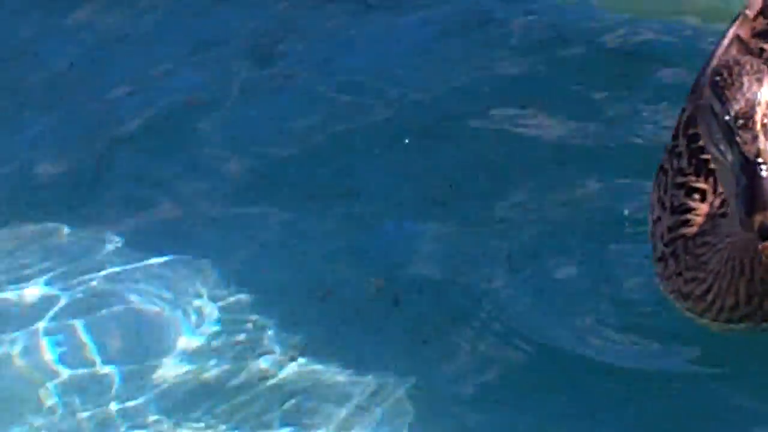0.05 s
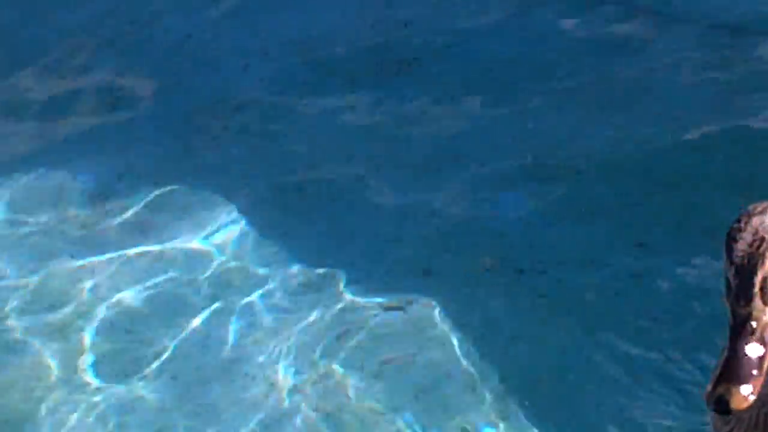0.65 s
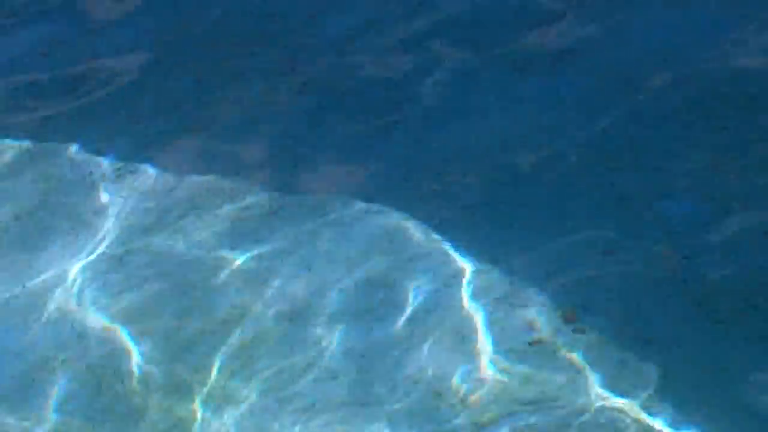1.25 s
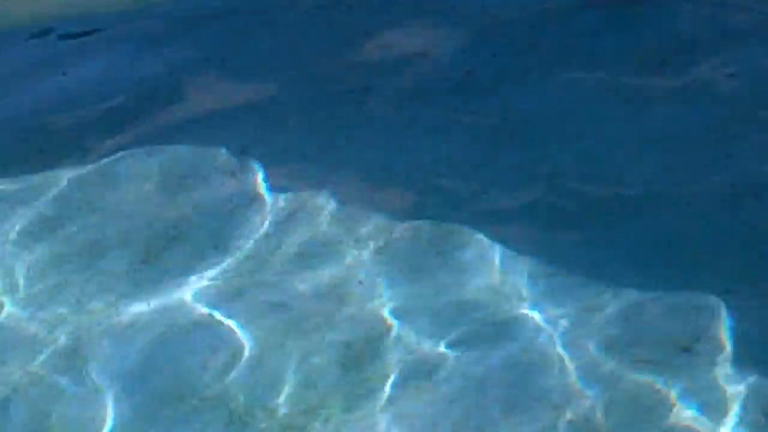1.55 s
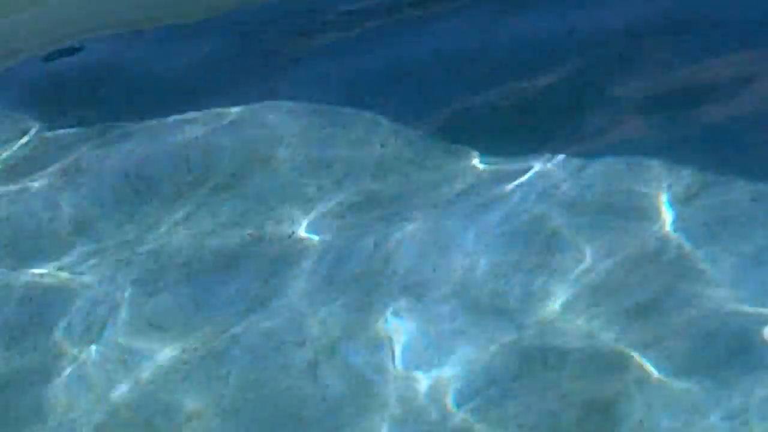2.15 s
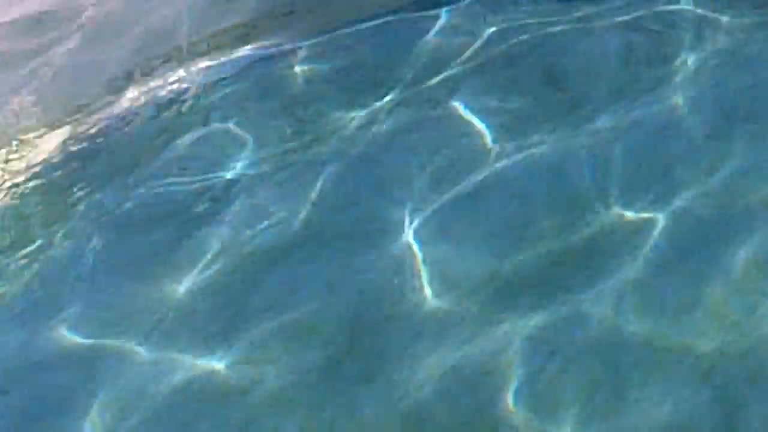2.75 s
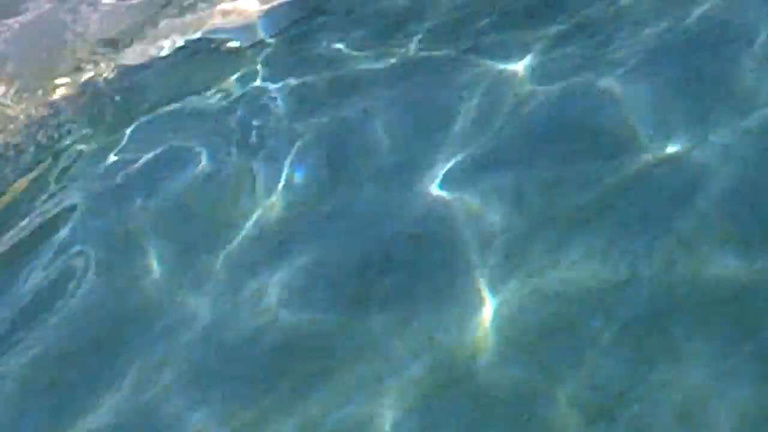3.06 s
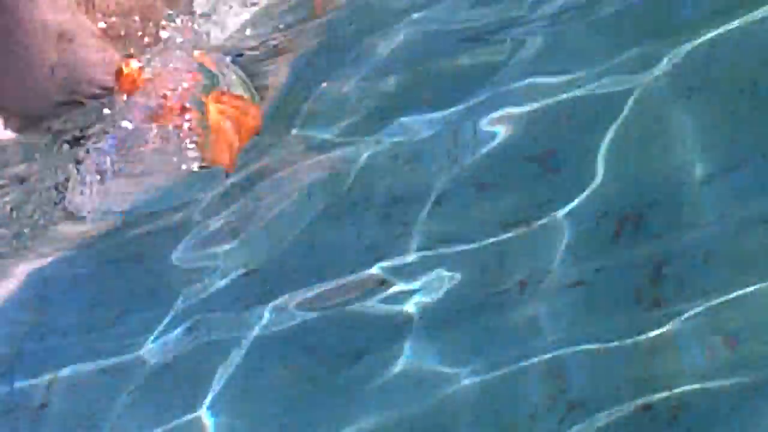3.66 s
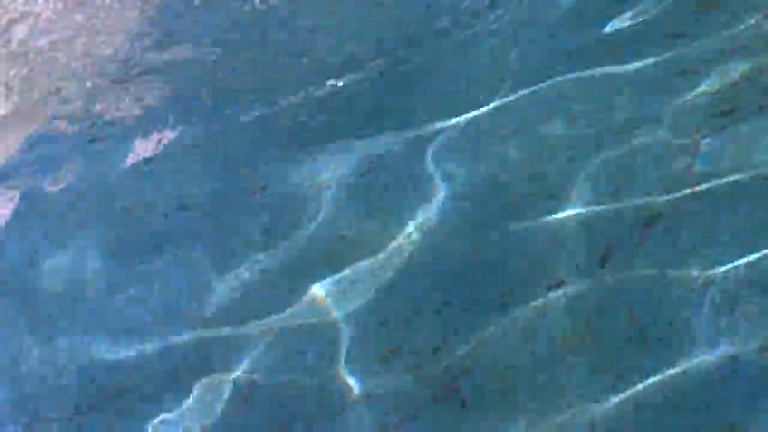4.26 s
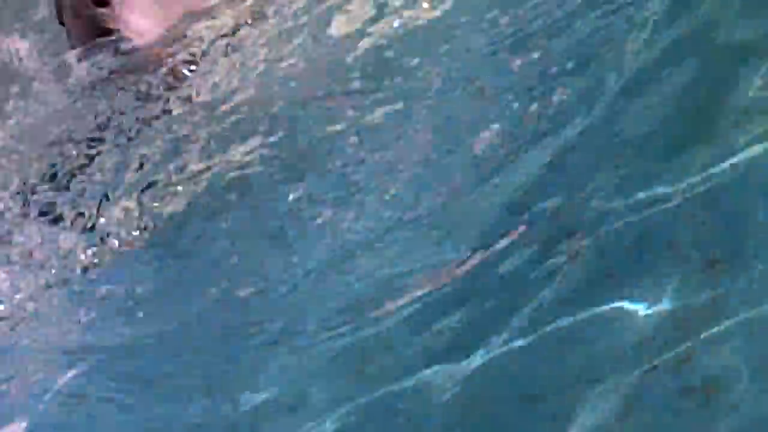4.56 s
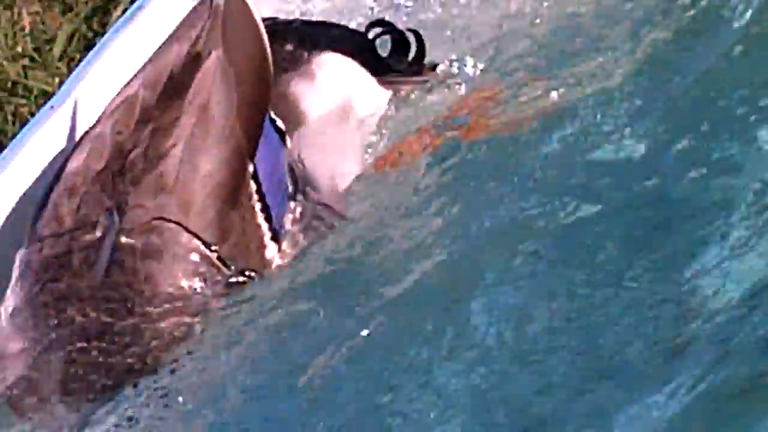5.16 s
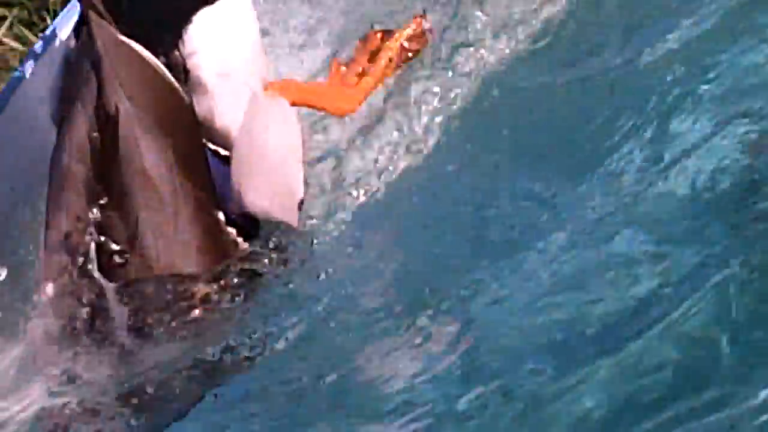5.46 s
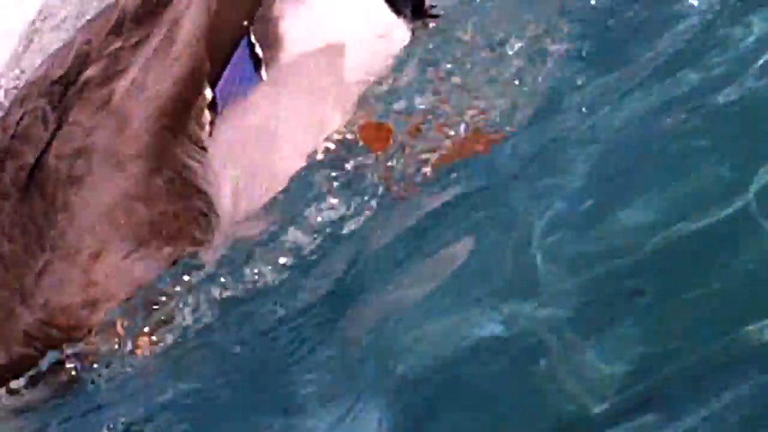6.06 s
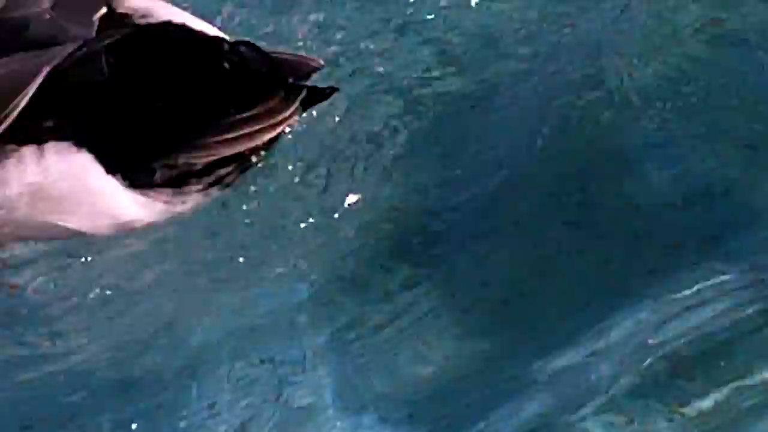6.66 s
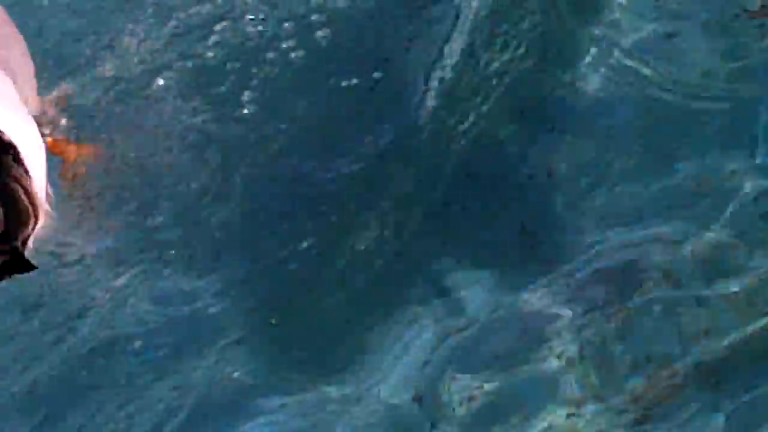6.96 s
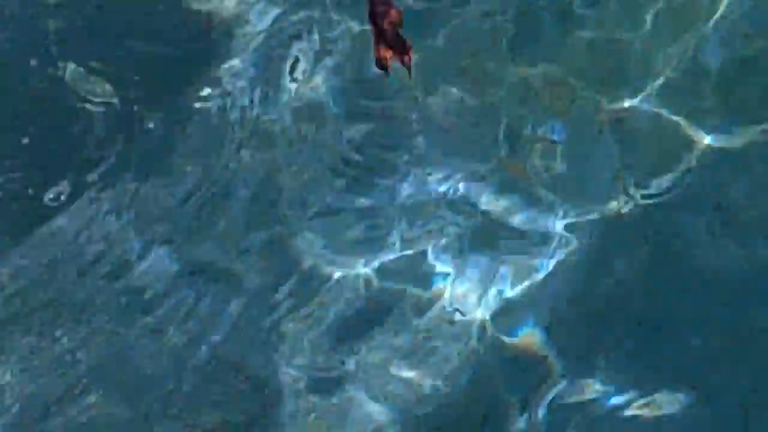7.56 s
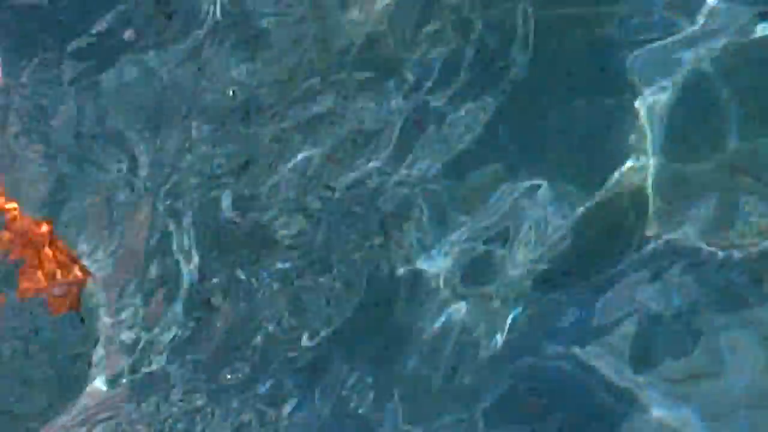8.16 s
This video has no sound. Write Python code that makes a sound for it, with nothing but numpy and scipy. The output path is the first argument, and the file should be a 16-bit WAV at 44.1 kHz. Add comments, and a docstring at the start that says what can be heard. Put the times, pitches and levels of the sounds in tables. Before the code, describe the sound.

Light sloshing and plopping from ducks in a small pool, as wind thumps the microphone and a duck peeps softly.

```python
"""A small garden pool, close by: ducks paddle and dabble.
Feet and bills trap air that rings as bubbles: slosh, spray, drops, plops and rising gurgles.
Afterwards a duck peeps and rasps softly. Wind rumbles and thumps dully on the microphone;
a small bird chirps far off and a nearer one calls upward."""
import sys
import numpy as np
from scipy import signal
from scipy.fft import rfft, irfft, next_fast_len
from scipy.io import wavfile
from scipy.ndimage import uniform_filter1d

SR = 44100
rng = np.random.default_rng(int(sys.argv[2]) if len(sys.argv) > 2 else 0)


def int16_out(signal):
    """Quantize to a 16-bit WAV file."""
    q = np.round(np.clip(np.atleast_2d(signal).T, -1, 1) * 32767)
    wavfile.write(sys.argv[1], SR, q.astype(np.int16))


N = 371222
TIME_S = np.arange(N) / SR
STEPS_S = np.arange(0, N / SR, .001)  # envelope grid
STIRRED_FROM_S = 1.85


def from_db(db):
    """Decibels to gain."""
    return 10 ** (np.asarray(db) / 20)


def rms_one(x):
    """Scale to unit power."""
    return x / np.sqrt(np.mean(x ** 2) + 1e-20)


def evened(x, span_s):
    """Unit power over every span; faster lumps stay."""
    return x / np.sqrt(np.abs(uniform_filter1d(x ** 2, int(span_s * SR) + 1)) + 1e-9)


def add(out, start_s, sound):
    """Mix a sound in at start_s."""
    i = max(0, int(start_s * SR))
    out[i:i + len(sound)] += sound[:max(0, N - i)]


def band(x, low_hz, high_hz, order=2):
    """Causal band-pass."""
    return signal.sosfilt(signal.butter(order, [low_hz, high_hz], "band", fs=SR, output="sos"), x)


def colour_db(colour, hz):
    """Level of a colour (freq_hz, level_db), interpolated in log frequency."""
    freq_hz, level_db = np.transpose(colour)
    return np.interp(np.log(hz + 1e-6), np.log(freq_hz), level_db)


def noise(colour):
    """Unit-power coloured noise, rolled off above the last point."""
    size = next_fast_len(N)
    hz = np.arange(size // 2 + 1) * SR / size
    gain = from_db(colour_db(colour, hz)) / np.sqrt(1 + (hz / (2 * colour[-1][0])) ** 4)
    return rms_one(irfft(rfft(rng.standard_normal(size)) * gain, size)[:N])


def lumps(spread_db, count):
    """Gain wandering through count random values over the scene."""
    knots_s = np.linspace(0, TIME_S[-1], count)
    return from_db(np.interp(TIME_S, knots_s, spread_db * rng.standard_normal(count)))


def swell(full_s, hold_s, rise_s, fall_db_per_s):
    """Envelope on STEPS_S: rises until full_s, holds, dies away."""
    attack = np.clip(1 + (STEPS_S - full_s) / rise_s, 0, 1)
    return attack * from_db(-fall_db_per_s * np.clip(STEPS_S - full_s - hold_s, 0, None))


def ring(hz, cycles, rise, onset_cycles=0.32):
    """Damped sine: dies 60 dB over cycles, sharpening by the fraction rise, as a surfacing bubble does."""
    life_samples = cycles / hz * SR
    progress = np.arange(int(life_samples) + 2) / life_samples
    onset = 1 - np.exp(-progress * cycles / onset_cycles)
    phase = 2 * np.pi * cycles * progress * (1 + rise * progress / 2)
    return onset * np.sin(phase) * np.exp(-np.log(1000) * progress)


def open_air(level_db=-62):
    """Faint, steady outdoor hiss."""
    # freq_hz, density_db
    air_colour = [(100, -7), (400, 5.5), (1000, 2), (2600, 1.5), (4000, -0.5), (4900, 2.5), (5600, -6.5),
                  (7000, -10.5), (9000, -13.5), (15000, -16.5)]
    return from_db(level_db) * noise(air_colour)


def blowing(light_breeze_db=-48.5, light_buffet_db=-62, buffet_db_per_db=2.04):
    """Rumble and buffet gains: gusts ride on a slow breeze, whose buffeting grows faster than rumble."""
    # time_s, rumble_db
    breeze = [(0.0, -46.5), (0.89, -47.5), (4.05, -47.5), (4.17, -45.5), (4.59, -47.5), (5.51, -36),
              (6.02, -38.5), (8.42, -48.5)]
    # full_s, hold_s, rumble_db, buffet_db
    gusts = [(0.008, .07, -40.5, -50), (0.323, 0.21, -49, -55.5), (2.224, 0.078, -42, -55.5),
             (2.73, .21, -39.5, -49), (3.33, 0.17, -31, -52.5), (4.125, 0.042, -25, -46),
             (4.256, 0.044, -31.5, -54), (4.951, 0.32, -38.5, -51), (5.282, 0.55, -30.5, -40),
             (6.07, 0.41, -40, -46), (6.888, 0.05, -32, -43), (7.175, 0.071, -56, -46.5),
             (7.447, 0.031, -35.5, -50), (7.614, .18, -42.5, -54.5), (8.005, .11, -39.5, -50.5)]
    breeze_db = np.interp(STEPS_S, *np.transpose(breeze))
    power = from_db([breeze_db, light_buffet_db + buffet_db_per_db * (breeze_db - light_breeze_db)]) ** 2
    for full_s, hold_s, rumble_db, buffet_db in gusts:
        gust = swell(full_s, hold_s, rise_s=0.049, fall_db_per_s=154)
        power += (from_db([[rumble_db], [buffet_db]]) * gust) ** 2
    return [np.interp(TIME_S, STEPS_S, gain) for gain in np.sqrt(power)]


def wind():
    """Large eddies rumble at the microphone port; smaller ones buffet it in uneven lumps."""
    # both: freq_hz, density_db
    rumble_colour = [(12, -1), (22, 1.5), (34, 3.5), (50, -2.5), (75, -6), (110, -17.5), (200, -42.5)]
    buffet_colour = [(50, -5), (90, 4), (140, -0.5), (220, -10), (350, -18), (700, -40.5), (1500, -36)]
    rumble_gain, buffet_gain = blowing()
    buffet = evened(lumps(spread_db=3, count=380) * noise(buffet_colour), span_s=0.16)
    rumble = evened(noise(rumble_colour), span_s=0.169)
    return rumble_gain * rumble + buffet_gain * buffet


def wind_thumps(slap_hz=270, slap_delay_s=0.00297):
    """Dull thumps of wind hitting the microphone, each a low damped pulse with a slap."""
    # start_s, relative_db, pitch_hz, slap_offset_db
    hits = [(0.07, -38, 120, -26), (2.235, -28.5, 88, -32), (2.255, -33, 84, -20), (2.425, -32.5, 110, -4),
            (2.731, -48, 121, -2), (3.303, -35, 93, -3), (4.131, -25, 88, -1), (4.598, -33.5, 88, -19),
            (5.08, -24.5, 105, -16), (5.442, -46, 135, 14.5), (5.948, -31.5, 98, -12),
            (6.211, -42, 94.5, 13), (6.921, -29.5, 125, 4)]
    out, slap = np.zeros(N), ring(slap_hz, cycles=2.58, rise=.05)
    for start_s, relative_db, pitch_hz, slap_offset_db in hits:
        add(out, start_s, from_db(relative_db + 13.5) * ring(pitch_hz, cycles=3.36, rise=0.038))
        add(out, start_s + slap_delay_s, from_db(relative_db + slap_offset_db + 15.5) * slap)
    return band(out, 27, 314)


def far_bird(length_s=0.067, low_hz=6850, arch_hz=420, trill_depth_hz=170, trill_hz=75, level_db=-70.5):
    """Thin arched chirps with a fast trill."""
    # start_s, end_s, interval_s
    bouts = [(.56, 3.75, .302), (4.15, 5.9, .51), (6.5, 8.42, .232)]
    out, age_s = np.zeros(N), np.arange(int(length_s * SR)) / SR
    arch = np.sin(np.pi * age_s / length_s)
    for start_s in np.concatenate([np.arange(*bout) for bout in bouts]):
        trill = np.sin(2 * np.pi * (trill_hz * age_s + rng.random()))
        pitch_hz = low_hz + arch_hz * arch + trill_depth_hz * trill
        add(out, start_s, from_db(level_db) * arch * np.sin(2 * np.pi * np.cumsum(pitch_hz) / SR))
    return out


def near_bird(fundamental_hz=1500, climb_hz_per_s=27000):
    """Thin upward calls, heard on their second and third harmonics."""
    # start_s, length_s, second_db, third_db
    calls = [(.412, 0.03, -54, -62), (1.293, 0.018, -76, -56.5), (1.55, .016, -74, -58)]
    out = np.zeros(N)
    for start_s, length_s, second_db, third_db in calls:
        age_s = np.arange(int(length_s * SR)) / SR
        phase = 2 * np.pi * np.cumsum(fundamental_hz + climb_hz_per_s * age_s) / SR
        tone = from_db(second_db) * np.sin(2 * phase) + from_db(third_db) * np.sin(3 * phase)
        add(out, start_s, np.sin(np.pi * age_s / length_s) * tone)
    return out


def duck_peeps(length_s=0.07, jitter=0.6, overtone_db=-15):
    """Soft falling peeps, each opened by a noisy cluck."""
    # start_s, relative_db, top_hz
    calls = [(7.318, -39.5, 918), (7.550, -42.5, 947), (7.746, -43, 990), (7.975, -41, 901),
             (8.356, -42.5, 932)]
    peeps, clucks = np.zeros((2, N))
    progress = np.linspace(0, 1, int(length_s * SR))
    for start_s, relative_db, top_hz in calls:
        pitch_hz = top_hz * (1 - .36 * progress ** 2.2) * (1 + rng.normal(0, jitter, len(progress)))
        phase = 2 * np.pi * np.cumsum(pitch_hz) / SR
        tone = np.sin(phase) + from_db(overtone_db) * np.sin(2 * phase)
        add(peeps, start_s, from_db(relative_db - 11.5) * np.sin(np.pi * progress ** 2) * tone)
        cluck = np.exp(-12 * progress) * rng.standard_normal(len(progress))
        add(clucks, start_s, from_db(relative_db + 12) * cluck)
    return peeps + band(clucks, 170, 630)


def duck_rasps(length_s=0.063):
    """Puffs of hoarse throat noise in two bands."""
    # start_s, relative_db
    rasps = [(6.876, -54), (7.424, -57), (7.973, -52), (8.162, -52)]
    throat, arch = np.zeros(N), signal.windows.hann(int(length_s * SR))
    for start_s, relative_db in rasps:
        add(throat, start_s, from_db(relative_db + 14) * arch * rng.standard_normal(len(arch)))
    return band(throat, 1120, 1750) + from_db(-16) * band(throat, 2100, 4800)


def spits(spray_gain, base_db=-65, spread_db=8, low_hz=4500, high_hz=14000, count=700):
    """Tiny droplets tick on the surface, harder in the spray, faintly after it."""
    out, strength = np.zeros(N), (spray_gain / np.median(spray_gain)) ** 0.2
    for when, rarity, smallness in rng.random((count, 3)):
        start_s = STIRRED_FROM_S + when * (TIME_S[-1] - STIRRED_FROM_S)
        gain = strength[int(start_s * SR)] * from_db(base_db + spread_db * min(-np.log(1 - rarity), 3))
        add(out, start_s, gain * ring(low_hz * (high_hz / low_hz) ** smallness, cycles=12, rise=0))
    return out


def gurgles(spread_db=3.5):
    """A cavity in the wake shrinks shut: its note swells unevenly and climbs."""
    # start_s, length_s, start_hz, end_hz, level_db
    cavities = [(2.128, 0.041, 182, 249, -36), (2.184, 0.022, 1040, 1400, -43),
                (2.699, 0.048, 471, 855, -52.5), (2.934, 0.081, 238, 400, -49),
                (3.633, 0.0265, 2670, 3770, -53), (3.704, 0.02, 466, 1010, -33),
                (3.899, 0.15, 135.7, 447, -39.5), (4.238, 0.017, 1750, 2580, -38.5),
                (4.4, 0.017, 1880, 2480, -46), (5.177, 0.043, 920, 1280, -44),
                (5.393, 0.021, 923, 1740, -39.5), (6.258, 0.027, 643, 1040, -44.5),
                (6.455, 0.052, 483, 1160, -36.5), (6.497, 0.06, 594, 1450, -50),
                (6.567, 0.034, 1850, 3350, -44.5)]
    out = np.zeros(N)
    for start_s, length_s, start_hz, end_hz, level_db in cavities:
        progress = np.linspace(0, 1, int(length_s * SR))
        phase = 2 * np.pi * np.cumsum(start_hz * (end_hz / start_hz) ** progress) / SR
        wobble_db = np.interp(progress, np.linspace(0, 1, 10), rng.normal(0, spread_db, 10))
        arch = np.sin(np.pi * progress ** 1.11)
        add(out, start_s, from_db(level_db + wobble_db) * arch * np.sin(phase))
    return out


def plops(cycles=19, fragments=3):
    """A foot or bill traps a large air pocket, which rings and breaks up."""
    # start_s, relative_db, pitch_hz
    pockets = [(1.872, -50.5, 574), (2.105, -54, 600), (2.781, -45, 536), (2.93, -38, 417),
               (3.006, -40, 338), (3.209, -41, 567), (3.765, -40, 760), (3.833, -45, 385),
               (4.451, -40, 447), (4.638, -41, 480), (4.872, -34.5, 664), (4.952, -34, 431),
               (5.157, -26, 524), (5.375, -31, 467), (6.148, -30.5, 490)]
    out = np.zeros(N)
    for start_s, relative_db, pitch_hz in pockets:
        add(out, start_s, from_db(relative_db + 7) * ring(pitch_hz, cycles, rise=0.067))
        delays_s = rng.uniform(0.00208, 0.017, fragments)
        fragments_hz = pitch_hz * np.exp(rng.normal(0.29, 0.756, fragments))
        for delay_s, hz in zip(delays_s, fragments_hz):
            add(out, start_s + delay_s, from_db(relative_db - 18) * ring(hz, cycles, rise=.15))
    return out


def drops(cycles=28, splatter_s=.006, splatters=6):
    """A drop cracks on the surface and traps a bubble; its splatter traps a few more."""
    # start_s, relative_db, pitch_hz, splatter_offset_db
    impacts = [(1.902, -41, 2240, -19), (1.9384, -31, 2800, -4.5), (1.9401, -29.5, 2210, -35),
               (2.0344, -39, 3750, 3.5), (2.141, -29.5, 1530, -13), (2.562, -28.5, 2320, -1.5),
               (2.7992, -16, 2360, -28), (2.8525, -37, 2770, 4.5), (2.9366, -31, 2360, -5),
               (2.987, -32, 3550, -19), (3.1061, -30.5, 1490, -7), (3.299, -30, 4530, -5.5),
               (3.3166, -22.5, 5230, -8), (3.7762, -30, 1430, -4.5), (3.8432, -31.5, 1500, -5.5),
               (4.0168, -19.5, 4680, -28), (4.2836, -38.5, 3230, -5), (4.4469, -29, 1470, -10.5),
               (4.529, -34, 4900, -6.5), (4.6705, -32.5, 2600, -4.5), (4.8764, -33, 2340, -15),
               (5.0647, -19, 2750, -18.5), (5.2666, -30, 2780, -17), (5.4442, -27, 4930, -19),
               (5.4953, -39, 2320, 3.5), (5.531, -40, 2750, -11), (5.6498, -35.5, 3260, -2.5),
               (6.098, -34.5, 2090, 2), (6.7297, -33, 5160, -24), (7.1886, -47.5, 3300, 4.5)]
    out, cracks = np.zeros((2, N))
    for start_s, relative_db, pitch_hz, splatter_offset_db in impacts:
        add(out, start_s, from_db(relative_db + 2.5) * ring(pitch_hz, cycles, rise=0.03))
        crack = rng.standard_normal(200) * np.exp(-np.arange(200) / 40)
        hardness = pitch_hz / 3000  # small fast drops crack hardest
        add(cracks, start_s, from_db(relative_db - 17) * hardness * crack)
        delays_s = .001 + rng.exponential(splatter_s, splatters)
        pitches_hz = np.minimum(pitch_hz * np.exp(rng.normal(0, 0.28, splatters)), SR / 4)
        levels_db = relative_db + splatter_offset_db + rng.normal(0, 2.5, splatters)
        for delay_s, hz, db in zip(delays_s, pitches_hz, levels_db):
            add(out, start_s + delay_s, from_db(db) * ring(hz, cycles, rise=.1))
    return out + band(cracks, 1500, 9400, order=1)


def bubble_cloud(colour, cycles, spread_db, count):
    """Bubbles of all sizes born at random, small ones more often; unit power."""
    out, low_hz, high_hz = np.zeros(N), colour[0][0], colour[-1][0]
    for when, smallness, rarity, life, depth in rng.random((count, 5)):
        start_s = STIRRED_FROM_S + when * (TIME_S[-1] - STIRRED_FROM_S)
        hz = low_hz * (high_hz / low_hz) ** (smallness ** 0.8064)
        gain = from_db(colour_db(colour, hz) + spread_db * min(-np.log(1 - rarity), 4)) * hz ** .8
        add(out, start_s, gain * ring(hz, cycles * (.4 + life), rise=.35 * depth ** 2))
    return rms_one(out)


def stirring(rise_s=0.023, lapping_db=-12.5):
    """Slosh and spray gains: each stroke of a foot or bill settles fast and leaves the water lapping."""
    # full_s, hold_s, slosh_db, spray_db
    strokes = [(2.043, 0.11, -46.5, -53), (2.562, 0.0094, -46, -52.5), (2.655, 0.13, -63, -84),
               (2.804, 0.25, -47.5, -50.5), (3.106, .07, -48.5, -52), (3.3, 0.16, -49, -53.5),
               (3.553, 0.032, -53.5, -61), (3.712, 0.0047, -42, -54.5), (3.77, 0.011, -49, -53),
               (3.841, 0.24, -48.5, -49.5), (4.293, .1, -53.5, -60.5), (4.444, 0.02, -47.5, -58.5),
               (4.671, 0.03, -50, -59), (4.767, 0.23, -46, -52), (5.048, 0.038, -57, -54),
               (5.142, 0.21, -46.5, -52), (5.36, 0.055, -41.5, -54), (5.53, 0.16, -50.5, -62),
               (5.72, 0.17, -56, -60), (6.094, 0.12, -48.5, -47), (6.137, 0.013, -35, -49),
               (6.224, 0.11, -70, -56.5), (6.451, 0.074, -52.5, -59.5), (6.692, 0.072, -63, -61),
               (6.84, 0.069, -72, -66), (7.983, .15, -62, -67.5)]
    power = np.full((2, len(STEPS_S)), 1e-12)
    for full_s, hold_s, slosh_db, spray_db in strokes:
        stroke = swell(full_s, hold_s, rise_s, fall_db_per_s=219)
        lapping = from_db(lapping_db) * swell(full_s, hold_s, rise_s, fall_db_per_s=26.5)
        power += (from_db([[slosh_db], [spray_db]]) * np.maximum(stroke, lapping)) ** 2
    return [np.interp(TIME_S, STEPS_S, gain) for gain in np.sqrt(power)]


def churn(slosh_gain, spray_gain, wash_db=-5):
    """Large bubbles slosh; small ones and a wash of bursting films make flurries of spray."""
    # both: freq_hz, density_db
    slosh_colour = [(200, -9), (330, -2), (480, 13), (620, -4.5), (760, 10), (1000, -2), (1350, 0.5),
                    (1800, -4.5), (3000, -33)]
    spray_colour = [(800, -5), (1400, -2.5), (2500, 3), (3600, -2), (5000, -1), (6500, -17), (9000, -24),
                    (11500, -18.5), (15000, -69)]
    slosh = evened(bubble_cloud(slosh_colour, cycles=37, spread_db=1.5, count=2100), span_s=0.032)
    fizz = evened(bubble_cloud(spray_colour, cycles=38, spread_db=5.5, count=9500), span_s=0.046)
    wash = from_db(wash_db) * noise(spray_colour)
    spray = evened((fizz + wash) * lumps(spread_db=3, count=700), span_s=0.11)
    return from_db(-1) * slosh_gain * slosh + from_db(4) * spray_gain * spray


def scene():
    """Water and duck close by, over wind, birds and open air; mono."""
    slosh_gain, spray_gain = stirring()
    water = churn(slosh_gain, spray_gain) + spits(spray_gain) + drops() + plops() + gurgles()
    duck = duck_peeps() + duck_rasps()
    return (water + duck + wind() + wind_thumps() + far_bird() + near_bird() + open_air())[None]


def record(dry, cutoff_hz=15300):
    """The recorder's notch filters cut dips in the treble, then a steep low-pass."""
    # centre_hz, width_hz
    notches = [(4230, 730), (7950, 1760), (8830, 690), (12620, 420)]
    for centre_hz, width_hz in notches:
        dry = signal.lfilter(*signal.iirnotch(centre_hz, centre_hz / width_hz, fs=SR), dry)
    return signal.sosfilt(signal.ellip(10, .1, 70, cutoff_hz, fs=SR, output="sos"), dry)


dry = scene()
out = record(dry)
int16_out(out)
```